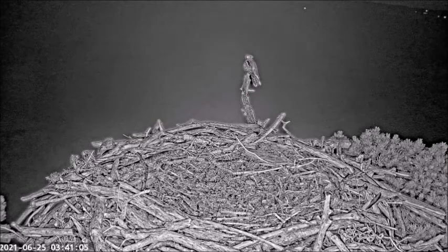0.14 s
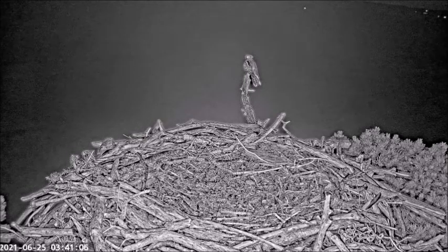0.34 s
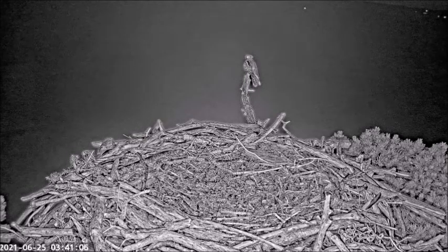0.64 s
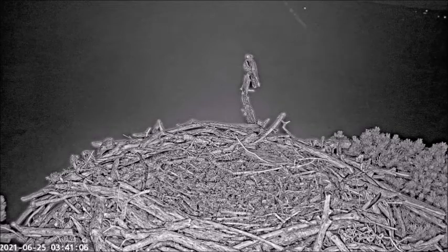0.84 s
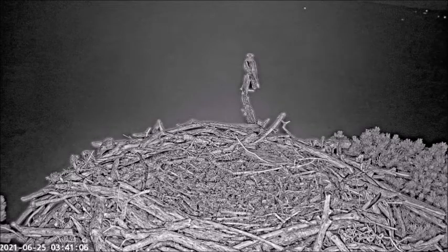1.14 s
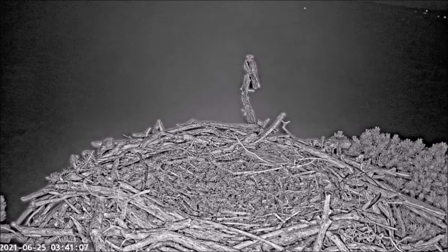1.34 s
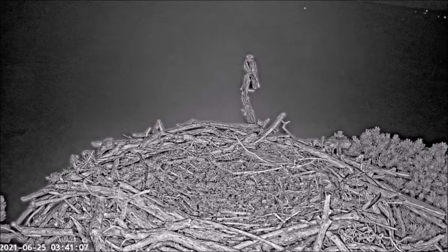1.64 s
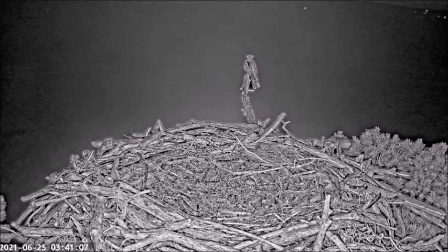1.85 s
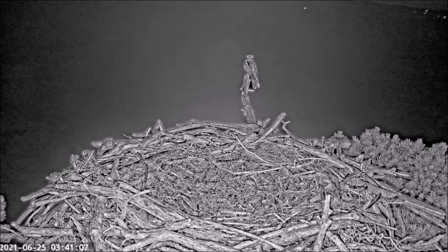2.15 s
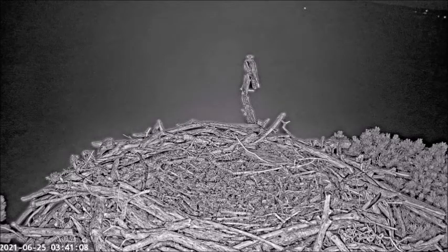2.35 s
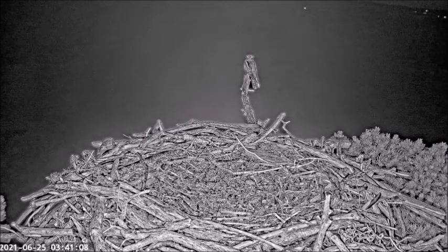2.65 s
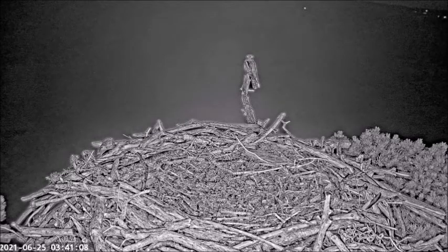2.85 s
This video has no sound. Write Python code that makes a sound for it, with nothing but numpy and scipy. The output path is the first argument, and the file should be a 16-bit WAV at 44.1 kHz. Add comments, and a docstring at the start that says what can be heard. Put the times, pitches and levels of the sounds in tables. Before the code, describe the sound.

A nightjar's rapid pulsed churring swells from barely audible to clear over low night wind rumble

```python
"""Night in the open: wind rumbles on an outdoor camera's microphone over a faint hum and thin hiss (shaped noise).
Early gusts and two thumps buffet it while a nightjar's churr is barely there; the churr then emerges in a lull.
It swells to the end, 25 rising to 27 falling notes a second built from gliding tones, each with a tail from trees.
Wind picks up again, with two more gusts and a thump. Throughout, mostly the treble drops out for instants."""
import sys
import numpy as np
from scipy import signal
from scipy.fft import rfft, irfft
from scipy.io import wavfile
from scipy.ndimage import uniform_filter1d

SR = 44100
rng = np.random.default_rng(int(sys.argv[2]) if len(sys.argv) > 2 else 0)


def digitize_waveform(pressure):
    """Quantize a signal to 16-bit integers and store it at the path in sys.argv[1].

    Rows of a 2-D input are taken as channels; values are limited to [-1, 1].
    """
    field = np.atleast_2d(pressure).T
    bounded = np.clip(field, -1, 1)
    quanta = np.round(bounded * 32767).astype(np.int16)
    wavfile.write(sys.argv[1], SR, quanta)


N = 131859
TIME_S = np.arange(N) / SR
BIN_HZ = np.fft.rfftfreq(N, 1 / SR)


def gain_of(db):
    """Decibels to amplitude gain."""
    return 10 ** (np.asarray(db) / 20)


def evened(x):
    """Scale to rms 1."""
    return x / np.sqrt(np.mean(x ** 2) + 1e-20)


def curve(points, column=1):
    """One column of a time table, interpolated at every sample."""
    rows = np.array(points)
    return np.interp(TIME_S, rows[:, 0], rows[:, column])


def read(points, hz):
    """Frequency table interpolated on a log-frequency axis."""
    f, value = np.transpose(points)
    return np.interp(np.log(hz + 1), np.log(f), value)


def noise(spectrum):
    """Gaussian noise of rms 1, shaped in the frequency domain."""
    white = rfft(rng.standard_normal(N))
    return evened(irfft(white * gain_of(read(spectrum, BIN_HZ)), N))


def steadied(x, size):
    """Divide noise by its running rms, so its level follows its control."""
    return x / np.sqrt(uniform_filter1d(x ** 2, size) + 1e-9)


def add(mix, start_s, sound):
    """Mix a sound in at start_s, clipped to the scene."""
    at = round(start_s * SR)
    part = mix[max(at, 0):max(at + len(sound), 0)]
    part += sound[max(-at, 0):][:len(part)]


# churr rate: t/s, rate/(notes/s)
CHURR_RATE = [(.85, 24.7), (1.1, 26.0), (1.35, 26.65), (2.1, 26.6), (2.2, 27.1), (3, 27.1)]
# churr loudness: t/s, level/dB
CHURR_LEVEL = [(0, -65), (.78, -71), (.83, -56.5), (.91, -47), (.95, -62), (.99, -51), (1.1, -50.5),
               (1.26, -45.5), (1.335, -49.5), (1.39, -53), (1.485, -53), (1.59, -65), (1.635, -50.5),
               (1.75, -48), (1.82, -49), (1.9, -48.5), (1.935, -44), (1.972, -50), (2.01, -42.5),
               (2.05, -46.5), (2.12, -42.5), (2.16, -41.5), (2.27, -38), (2.455, -37), (2.49, -36),
               (2.6, -34.5), (2.64, -33.7), (2.678, -37), (2.75, -31.5), (2.8, -33.5), (2.86, -31),
               (2.935, -31.5), (2.97, -28.5)]
# soft opening notes sit higher: t/s, pitch ratio
CHURR_PITCH = [(1.3, 1.05), (1.7, 1.035), (2.0, 1.012), (3, 1.007)]
# lead-in tick relative to note body: t/s, level/dB
LEAD_LEVEL = [(1.1, -15), (1.4, 6), (1.85, 7.5), (2.05, 1.5), (2.3, -1.5), (2.6, -1.5), (2.97, -2)]
# high tick and its faint ring, nominal: centre after peak/s, half-length/s, f/Hz, glide/(Hz/s), level/dB
LEAD_TONES = [(-.00725, .0017, 2465, -15000, -8.5), (-.0052, .0009, 2200, -60000, -13.7),
              (-.0011, .008, 2390, 0, -24)]
# falling tone, low end, afterbeat, ring: same columns
BODY_TONES = [(-.00039, .00316, 1601, -35750, -2.8), (.00106, .00216, 1322, -70000, -10),
              (.00425, .00194, 1579, 47500, -5.9), (.00885, .008, 1503, 20000, -20.5)]
BEAT_S = 2.9725  # one note peaks here; the others count from it
NOTE_SPREAD_DB, PITCH_SPREAD_RATIO, TIMING_SPREAD_S = 0.4, 0.007, 0.0003


def nightjar():
    """Near-identical notes, high lead-in plus falling body, triggered by the integrated churr rate."""
    turns = np.cumsum(curve(CHURR_RATE)) / SR
    turns -= np.interp(BEAT_S, TIME_S, turns)
    beats = np.flatnonzero(np.diff(np.floor(turns)))
    level_db, lead_db, ratio = curve(CHURR_LEVEL), curve(LEAD_LEVEL), curve(CHURR_PITCH)
    out = np.zeros(N)
    spread = rng.standard_normal((len(beats), 3))
    for at, (loud, sharp, late) in zip(beats, spread):
        pitch = ratio[at] + PITCH_SPREAD_RATIO * sharp
        lead = gain_of(lead_db[at]) * tones(LEAD_TONES, pitch)
        note = lead + tones(BODY_TONES, pitch)
        start_s = (at - len(note) / 2) / SR + TIMING_SPREAD_S * late
        add(out, start_s, gain_of(level_db[at] + NOTE_SPREAD_DB * loud) * note)
    return out


TONE_SPREAD_DB = 1.1


def tones(table, pitch):
    """Gaussian-windowed linear glides around a note's peak, levels varied per note."""
    t = np.arange(-SR // 35, SR // 35) / SR
    out = np.zeros(len(t))
    chances = rng.standard_normal(len(table))
    for (centre_s, half_s, hz, glide_hz_per_s, db), chance in zip(table, chances):
        u = t - centre_s
        cycles = pitch * hz * u + glide_hz_per_s * u ** 2 / 2
        envelope = np.exp(-(u / half_s) ** 2)
        out += gain_of(db + TONE_SPREAD_DB * chance) * envelope * np.cos(2 * np.pi * cycles)
    return out


NEAR_DB = -27  # notes fainter than this get more tail


def faintness_db():
    """Depth of the churr below its near level."""
    return np.maximum(NEAR_DB - curve(CHURR_LEVEL), 0)


TREES_DB, TREES_T60_S, TREES_DELAY_S = -11, 0.48, 0.0054


def trees(x):
    """Short diffuse tail scattered by trees: convolution with decaying noise."""
    t = TIME_S[:SR // 2]
    decay = np.exp(-np.log(1000) * t / TREES_T60_S)
    tail = rng.standard_normal(len(t)) * (t > TREES_DELAY_S) * decay
    return gain_of(TREES_DB) * signal.fftconvolve(x, tail / np.linalg.norm(tail))[:N]


# wind, before trims: t/s, rumble level/dB, buffeting level/dB
WIND_LEVEL = [(0, -30.5, -45), (.17, -28, -42), (.25, -26, -43), (.4, -26.5, -44), (.75, -26, -46.5),
              (.95, -27.5, -43), (1.2, -32.5, -48), (1.55, -32.5, -48), (1.8, -29.5, -43), (1.95, -32, -42),
              (2.1, -30, -40), (2.3, -29.5, -47), (2.5, -26.5, -42.5), (2.65, -27.5, -42), (2.8, -27, -44),
              (2.97, -30, -39.5)]
# rumble spectrum in brisk wind: f/Hz, relative level/dB
BRISK_SPECTRUM = [(6, -6.5), (16, 8.5), (35, -5.5), (60, 1), (90, -7), (125, -12.5), (180, -21), (300, -35),
                  (450, -92), (900, -130)]
# rumble spectrum in slack wind, duller: f/Hz, relative level/dB
LULL_SPECTRUM = [(6, -4.5), (16, 2.5), (35, 3), (60, -7), (90, -3), (125, -19), (180, -36), (300, -46.5),
                 (450, -66), (900, -130)]
# buffeting spectrum: f/Hz, relative level/dB
BUFFET_SPECTRUM = [(40, -9), (110, -0.5), (150, 0.5), (220, -3), (295, -4.5), (335, -14.5), (400, -25),
                   (520, -50.5), (900, -40), (2000, -130)]
# gusts on the microphone: t/s, half-length/s, level/dB
GUST_EVENTS = [(0.42, 0.046, -35), (0.498, 0.039, -28), (0.611, 0.017, -22.5), (0.699, 0.069, -30.5),
               (1.793, 0.0097, -36.5), (2.844, 0.045, -28.5)]
RUMBLE_TRIM_DB, BUFFET_TRIM_DB = 3, 1.5
BRISK_DB, SLACK_RANGE_DB = -27, 6.5  # untrimmed: below brisk, rumble turns wholly dull within the range
FADE_IN_S = 0.012


def wind():
    """Deep turbulence rumble that dulls in lulls, plus higher buffeting that leaps in gusts."""
    level_db = curve(WIND_LEVEL)
    slack = np.clip((BRISK_DB - level_db) / SLACK_RANGE_DB, 0, 1)
    blend = np.sqrt(1 - slack) * noise(BRISK_SPECTRUM) + np.sqrt(slack) * noise(LULL_SPECTRUM)
    rumble = steadied(blend, size=4500) * gain_of(RUMBLE_TRIM_DB + level_db)
    gusts = sum(gain_of(db) * np.exp(-((TIME_S - s) / half_s) ** 2) for s, half_s, db in GUST_EVENTS)
    steady_gain = gain_of(BUFFET_TRIM_DB + curve(WIND_LEVEL, 2))
    buffet = steadied(noise(BUFFET_SPECTRUM), size=1600) * np.hypot(steady_gain, gusts)
    fade_in = np.sin(np.pi / 2 * np.minimum(TIME_S / FADE_IN_S, 1)) ** 2
    return (rumble + buffet) * fade_in


# single eddies: t/s, f/Hz, peak level/dB
THUMP_EVENTS = [(0.616, 55, -19), (0.659, 99, -15), (2.573, 91, -15.5)]


def thumps():
    """Eddies tug at the microphone: one soft pressure swing (Ricker pulse) each."""
    out = np.zeros(N)
    for s, hz, db in THUMP_EVENTS:
        u = (np.pi * hz * (TIME_S - s)) ** 2
        out += gain_of(db) * (2 * u - 1) * np.exp(-u)
    return out


HUM_HZ, HUM_WIDTH_HZ, HUM_DB = 298.9, 5.7, -55


def hum():
    """Faint wavering hum: noise in a narrow Gaussian band."""
    white = rfft(rng.standard_normal(N))
    band = irfft(white * np.exp(-((BIN_HZ - HUM_HZ) / HUM_WIDTH_HZ) ** 2), N)
    return gain_of(HUM_DB) * steadied(evened(band), size=8000)


# microphone hiss spectrum: f/Hz, relative level/dB
HISS_SPECTRUM = [(100, -7.5), (400, 3), (700, -0.5), (1100, -1.5), (2000, -3), (3500, -6), (6000, -8),
                 (9500, -9), (12000, -12.5), (13400, -17.5), (14400, -22.5), (15700, -35)]
HISS_DB = -53.5


def hiss():
    """Even microphone hiss: stationary shaped noise."""
    return gain_of(HISS_DB) * noise(HISS_SPECTRUM)


# brief dips: t/s, half-length/s, full depth/dB
DROPOUT_EVENTS = [(.119, .010, 9), (.273, .009, 5), (.934, .010, 5), (1.399, .010, 8), (1.527, .009, 7),
                  (2.13, .009, 4), (2.478, .016, 12), (2.554, .008, 6), (2.592, .009, 11),
                  (2.786, .007, 10)]
# share of full depth, largest in the treble: f/Hz, share (0-1)
DROPOUT_SHARE_BY_HZ = [(400, 0.23), (1200, 0), (3000, 0.35), (6000, 0.82), (10000, 1), (13000, 1)]


def dropouts(x):
    """Mostly the treble of the whole mix dips for instants: flat-topped gain dips on an STFT."""
    hz, t, z = signal.stft(x, SR, nperseg=256, noverlap=192)
    dip_db = sum(depth_db * np.exp(-((t - s) / half_s) ** 4) for s, half_s, depth_db in DROPOUT_EVENTS)
    share = np.clip(read(DROPOUT_SHARE_BY_HZ, hz), 0, 1)
    z = z * gain_of(-share[:, None] * dip_db)
    return signal.istft(z, SR, nperseg=256, noverlap=192)[1][:, :N]


EXTRA_TAIL_DB_PER_DB = 0.21  # per dB of faintness


def scene():
    """Bird and its tail, more diffuse when faint, over wind, thumps, hum and hiss."""
    bird = nightjar()
    tail = trees(bird * gain_of(EXTRA_TAIL_DB_PER_DB * faintness_db()))
    return (bird + tail + wind() + thumps() + hum() + hiss())[None]


EDGE_HZ = 15500


def record(dry):
    """Brief dropouts, then the recorder's band limit: linear-phase low-pass."""
    lowpass = signal.firwin(511, EDGE_HZ, window=("kaiser", 9), fs=SR)
    return signal.oaconvolve(dropouts(dry), lowpass[None], "same")


dry = scene()
out = record(dry)
digitize_waveform(out)
```